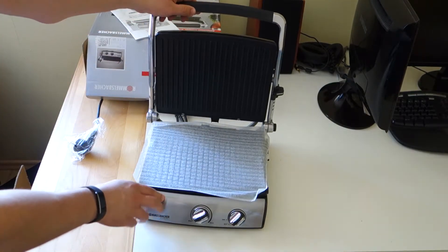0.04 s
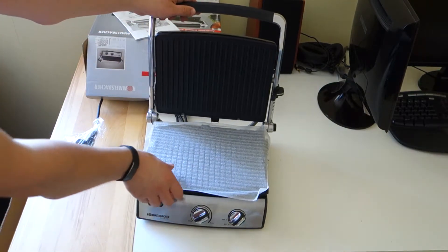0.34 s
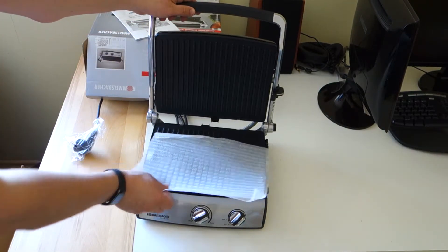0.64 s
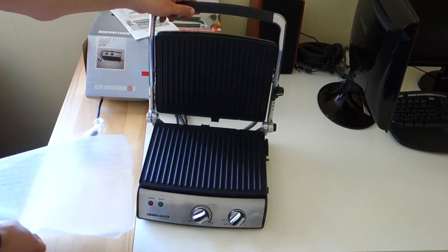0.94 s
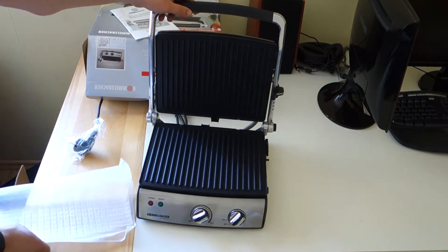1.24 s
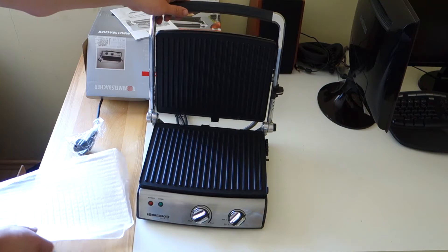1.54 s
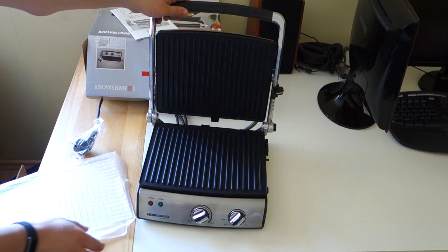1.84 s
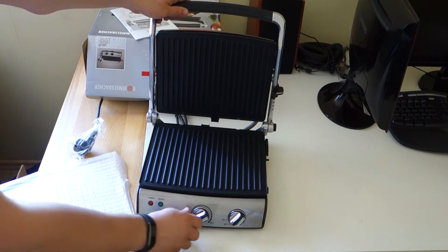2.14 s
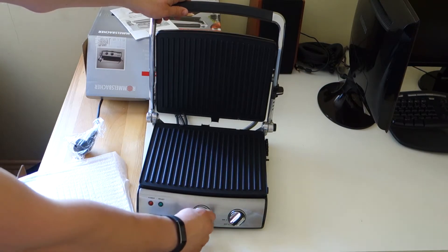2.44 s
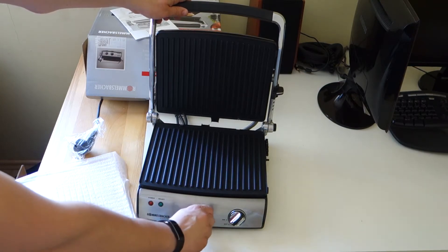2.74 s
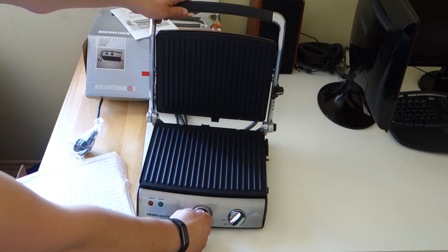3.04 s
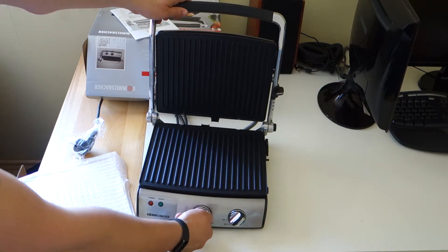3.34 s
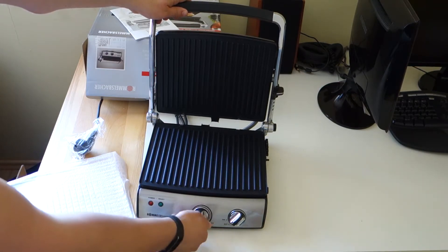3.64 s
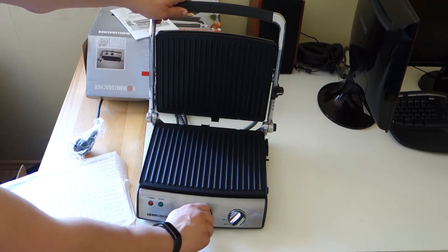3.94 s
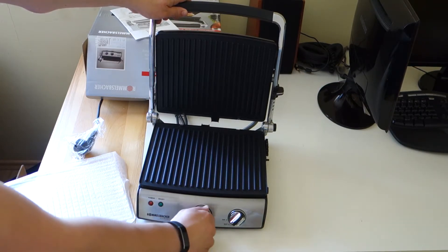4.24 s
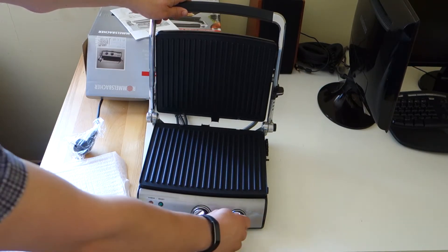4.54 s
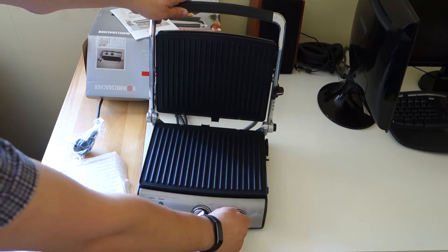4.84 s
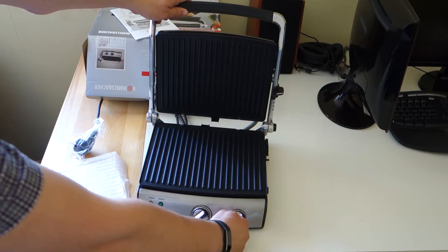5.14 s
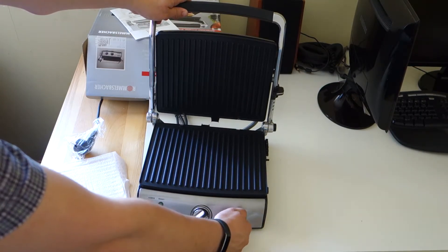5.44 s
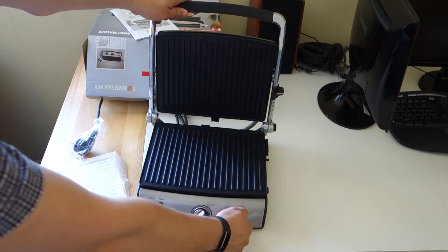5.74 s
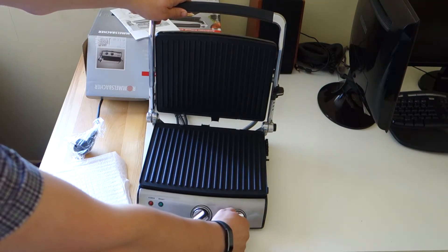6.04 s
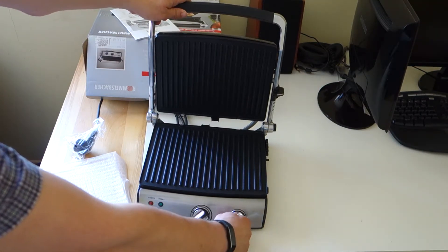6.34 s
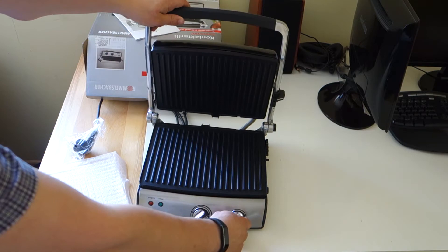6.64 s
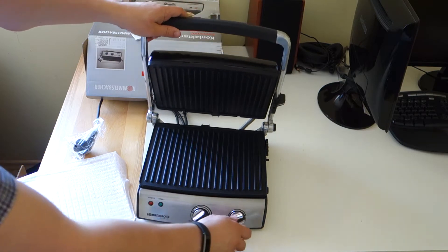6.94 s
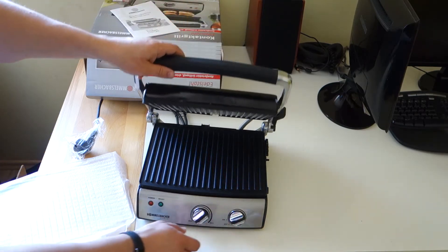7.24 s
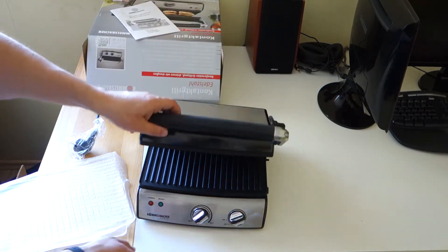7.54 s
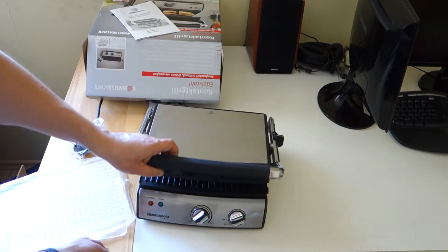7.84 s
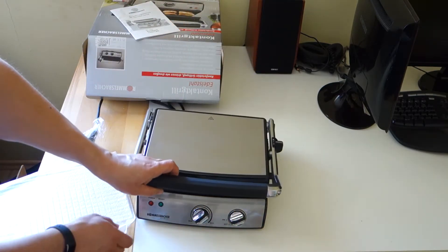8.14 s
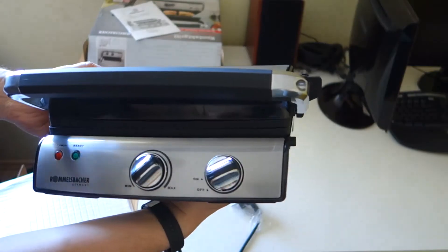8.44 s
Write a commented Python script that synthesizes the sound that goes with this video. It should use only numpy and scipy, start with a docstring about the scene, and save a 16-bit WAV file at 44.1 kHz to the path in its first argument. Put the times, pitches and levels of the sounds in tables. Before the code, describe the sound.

In a bare, slightly ringing room, a nearby stereo microphone picks up fingers rubbing a tabletop grill and a thin sheet crinkling off its plate. A dial clicks and ratchets, then a switch gives two sharp, buzzing snaps, the loudest sounds. Hinges scrape and tick softly before the metal lid lands in a quick cluster of clacks. A fan whines faintly behind it all.

```python
"""A contact grill on a desk in a bare, lively room, heard from a microphone pair 3.1 cm apart.
Fingers rub the housing and a thin packing sheet is pulled off the plate. One knob is clicked and wound
over its ratchet, the other snaps a switch on and off, then the lid scrapes down on its hinges and clacks
shut. Each blow rings the housing and reaches the microphones directly, off the desk and off the walls.
Behind it a fan whines faintly, and a low hum comes and goes."""
import sys
import numpy as np
from scipy import signal
from scipy.fft import rfft, irfft
from scipy.io import wavfile

SR = 44100
rng = np.random.default_rng(int(sys.argv[2]) if len(sys.argv) > 2 else 0)


def wrap_up_sound(samples):
    """Save the sound to the file named by the first command line argument, as 16-bit audio."""
    columns = np.atleast_2d(samples).T
    # keep every value between -1 and 1, then stretch to whole-number steps
    tamed = np.clip(columns, -1, 1)
    steps = np.round(tamed * 32767).astype(np.int16)
    wavfile.write(sys.argv[1], SR, steps)


N = 374409
TIME = np.arange(N) / SR
MIC_GAP_M = .031

# Blows. Each row: start in seconds, relative level in dB, bass in dB, treble in dB.
HAND_BUMPS = [(.11, -57, 12, -5), (.18, -56, 2, -1), (.252, -56.5, -7, 9), (.315, -50, -28, -6),
              (4.135, -45, -7, -3), (7.115, -53, 7, -5)]  # hands on the housing and the desk
SHEET_CRINKLES = [(.53, -45.5, -11, 5), (.742, -43, -1, 2), (.85, -48.5, 7.5, -5)]
LEFT_KNOB_CLICKS = [(2.487, -49, 5, -25), (2.508, -36, -2.5, -11), (2.519, -35.5, -1, -4.5),
                    (2.999, -39.5, -13.5, -20), (4.115, -28.5, -3, 5.5), (4.143, -26.5, -0.5, 4.5),
                    (4.226, -37, 3.5, 1)]
SNAPS = [(5.325, -12, -0.5, 0.5), (5.364, -16.5, 2, -3), (5.922, -11, 3.5, 11), (5.955, -12, -2, 1.5)]  # on, rebound, off, rebound
LID_BLOWS = [(6.395, -47.5, -1, -17), (6.691, -54, 16, 0), (7.08, -52, 11, -25), (7.559, -41, 3.5, 5.5),
             (8.088, -22.5, 0.5, 2.5), (8.116, -21.5, -5, -0.5), (8.152, -20, 0, 2), (8.174, -20.5, 0, -3),
             (8.193, -31, -11, -20)]
ARM_TICKS = [(7.023, -58, -12, 2), (7.178, -53.5, -7, 5), (7.258, -51.5, 0, -3), (7.36, -46.5, -11, 0)]
PLATE_STOPS = [(7.607, -37, -6, -11), (7.734, -44, 4.5, 6.5)]
# The ratchet's teeth. Each row: start in seconds, relative level in dB.
TEETH = [(3.196, -32.5), (3.218, -32), (3.253, -33), (3.279, -33), (3.302, -29), (3.325, -31),
         (3.351, -27.5), (3.378, -25.5), (3.397, -25), (3.416, -29), (3.441, -28.5), (3.472, -28.5),
         (3.497, -27.5), (3.543, -27)]

# Hand strokes. Each row: start in seconds, length in seconds, relative level in dB.
HOUSING_RUBS = [(0, 0.019, -46), (.25, 0.032, -54.5), (.45, .04, -53.5), (.6, 0.026, -51.5),
                (.925, 0.043, -51)]
FINGERTIP_SCRAPES = [(0, 0.065, -59)]
SHEET_TUGS = [(.255, 0.038, -58.5), (.36, 0.059, -58), (.445, 0.067, -60), (.518, .11, -42.5),
              (.68, 0.11, -45.5), (.93, 0.059, -53), (1.61, .06, -58), (1.695, .035, -54.5)]
# Two pushes on the lid. Each row: start in seconds, length in seconds, rubbing in dB, scraping in dB.
LID_PUSHES = [(6.35, 0.37, -52, -69), (6.816, 0.83, -50, -55.5)]

# Broad colour of each source. Each row: frequency in Hz, gain in dB.
AIR_COLOUR = [(15, -55.5), (25, -16), (130, -2.5), (263, -5), (301, -5.5), (344, -7), (560, -13.5),
              (624, -8), (936, -13.5), (1020, -6.5), (1400, -22), (2220, -10.5), (2840, -20.5),
              (12900, -31.5), (16000, -59)]
RUB_COLOUR = [(60, -14), (130, -4.5), (300, -9), (520, -1), (750, -9), (1600, -12), (2400, -13.5),
              (4000, -16), (16000, -40.5)]
SCRAPE_COLOUR = [(500, -40), (1500, 1.5), (2400, -6), (4000, -4.5), (5600, -14), (8000, -7.5), (11000, -29),
                 (16000, -35)]
BUMP_COLOUR = [(25, -5), (60, -19), (130, 0), (240, -10), (400, -10), (1300, -29), (3000, -42),
               (16000, -50)]
SHEET_COLOUR = [(200, -21), (900, -5.5), (2000, -5), (4000, -1), (8000, 5), (11000, 1.5), (16000, -11)]
KNOB_COLOUR = [(30, -34), (75, -19), (115, -3.5), (200, -15), (350, 0.5), (470, -1), (700, 0.5),
               (1200, 0.5), (2300, -2.5), (3300, -7), (5000, -4), (8000, -7.5), (9600, -2.5), (11000, -8),
               (16000, -13)]
RATCHET_COLOUR = [(30, -30.5), (75, -22), (115, -5.5), (160, -16), (220, -11), (350, -6), (500, -4.5),
                  (850, 4), (1400, 4.5), (2400, -2), (4000, -5.5), (6500, -1.5), (9500, -2.5), (13000, -9),
                  (16000, -17)]
ON_COLOUR = [(60, -21), (130, -7), (320, -19.5), (600, -11.5), (1100, 1.5), (1800, 1), (2800, 1),
             (3500, -4.5), (4200, 1), (4800, -3), (5900, 3), (8000, -2.5), (10000, -9.5), (16000, -18.5)]
OFF_COLOUR = [(60, -27), (300, -14), (600, -12.5), (1100, 1.5), (1400, -1.5), (2300, 3), (4400, 7.5),
              (4950, -9), (6000, -4), (8000, -13.5), (9400, -5), (11500, -12), (12700, -11), (16000, -30)]
LID_COLOUR = [(55, -13), (100, -16.5), (180, -7), (290, -12), (450, 3.5), (750, -4.5), (1000, 2),
              (2700, -1), (4000, 0), (5500, -5), (7500, -8.5), (11000, -18), (16000, -34)]
PLATE_COLOUR = [(100, -22), (600, -8), (1000, -3.5), (1600, 1.5), (2100, -4), (3000, -10), (4300, -6),
                (5500, -17), (9000, -27), (16000, -47)]

# Resonances. Each row: frequency in Hz, width in Hz, peak or dip in dB.
FAN_MODES = [(1001.6, 19.3, 11.5), (1480, 400, 4), (2180, 130, 2.5)]
HOUSING_MODES = [(117.8, 8.5, 9.5), (237, 40, 5.5), (310, 73, -10), (361.6, 23, 9.5), (450.4, 60, -3),
                 (510, 52, 8.5), (569.7, 58, 15.5), (614, 73, -12), (851.5, 17, 6.5), (1255, 20, 5.5),
                 (1710, 54, 3), (2390, 700, 4.5)]
HINGE_MODES = [(2850, 150, -7), (3220, 530, -9), (3630, 160, 5.5), (3930, 150, 10.5), (4270, 400, 3),
               (4690, 170, 12.5), (7200, 450, 4), (8400, 400, -2)]
KNOB_SPRING_MODES = [(490, 50, 4), (820, 40, 7), (1210, 36, 3.5), (1357, 19, 6), (1690, 850, -3),
                     (2330, 380, 2.5), (9360, 340, 3), (9700, 160, -5)]  # spring and frame behind the knob
SWITCH_BLADE_MODES = [(1010, 38, 4), (1215, 240, -2), (1766, 170, 7.5), (2000, 40, -0.5), (2650, 35, 4.5),
                      (2860, 86, 3.5), (5860, 220, 5), (6460, 60, -3), (7300, 200, -5.5)]  # blade and case
LID_COVER_MODES = [(292, 50, 19), (668, 28, 11), (867, 7.5, 4.5), (1280, 40, -2.5), (1604, 14, 7.5),
                   (2760, 19, 10.5), (3100, 20, 6), (7660, 21, -8)]  # the lid's plate and cover

# The room's decay. Each row: frequency in Hz, time to fall 60 dB in seconds.
ROOM_DECAY = [(100, 0.664), (450, 0.45), (1000, 0.65), (2000, 0.7), (4000, 0.63), (6000, 0.59),
              (9000, 0.42), (15000, 0.24)]


def undb(db):
    """Decibels to gain."""
    return 10 ** (np.asarray(db) / 20)


def unit(x):
    """Scale to rms 1."""
    return x / np.sqrt(np.mean(x ** 2))


def bins(size):
    """Frequencies of a spectrum of `size` samples."""
    return np.maximum(np.fft.rfftfreq(size, 1 / SR), 1)


def walk(rate):
    """A random drift with a spread near 1 and `rate` turns a second."""
    knots = rng.standard_normal(int(rate * N / SR) + 2)
    return np.interp(TIME * rate, np.arange(len(knots)), knots)


def fade(power, seconds):
    """Let stored energy leak away with the given time constant."""
    keep = np.exp(-1 / (seconds * SR))
    return signal.lfilter([1 - keep], [1, -keep], power)


def swell(start, length):
    """A half-sine arch from rest to 1 and back to rest."""
    share = (TIME - start) / length
    return np.where((share > 0) & (share < 1), np.abs(np.sin(np.pi * share)), 0)


def colour(hz, points, resonances=()):
    """Gain in dB: a broad outline with resonant peaks and dips on it."""
    at, db = np.transpose(points)
    outline = np.interp(np.log(hz), np.log(at), db)
    return outline + sum(peak / (1 + (2 * (hz - f) / width) ** 2) for f, width, peak in resonances)


def ring(db):
    """Causal response of unit energy with the given gain curve."""
    cepstrum = irfft(np.log(undb(db)))
    half = len(cepstrum) // 2
    cepstrum[1:half] *= 2
    cepstrum[half + 1:] = 0
    response = irfft(np.exp(rfft(cepstrum)))
    return response / np.linalg.norm(response)


def through(x, points, resonances=(), size=8192):
    """Play a drive signal through a resonant body."""
    return signal.fftconvolve(x, ring(colour(bins(size), points, resonances)))[:len(x)]


def diffuse(size):
    """Spectra of noise from all sides at the two microphones: alike in the bass, unrelated higher up."""
    likeness = .99 * np.sinc(2 * bins(size) * MIC_GAP_M / 343)
    mid, side = rfft(rng.standard_normal((2, size)))
    return mid * np.sqrt(1 + likeness) + np.array([[1], [-1]]) * side * np.sqrt(1 - likeness)


def room(power, direct_db, desk_db, desk_s=0.0084, build_s=0.0026):
    """A burst of power reaches the microphones as noise: straight, off the desk, then off the walls."""
    size = len(power)
    field = diffuse(size)
    direct = rng.standard_normal(size) * np.sqrt(2 * power)
    desk = irfft(diffuse(size)) * np.sqrt(fade(power, desk_s))
    band_hz, t60s = np.transpose(ROOM_DECAY)
    walls, arriving = 0, fade(power, build_s)
    for band, t60 in zip(np.eye(len(band_hz)), t60s):
        weight = np.interp(np.log(bins(size)), np.log(band_hz), band)
        tail = np.sqrt(fade(arriving, t60 / np.log(10 ** 6)))
        walls = walls + irfft(field * weight) * tail
    return undb(direct_db) * direct + undb(desk_db) * desk + walls


def in_room(sound):
    """Carry a mono sound from the desk through the room to both microphones."""
    response = room(signal.unit_impulse(2 ** 15), direct_db=-2, desk_db=-1.5)
    response /= np.linalg.norm(response[0])
    return signal.fftconvolve(sound[None], response, axes=1)[:, :N]


def strokes(events, attack_s=0.0029, release_s=0.018):
    """Force of short hand strokes: each takes hold, stays for its length and lets go."""
    force = 0
    for start, length, db in events:
        hold = np.clip((TIME - start) / attack_s, 0, 1)
        release = np.exp(-np.maximum(TIME - start - length, 0) / release_s)
        force = force + undb(db) * hold * release
    return force


def friction(force, slips_per_s, scatter_db, uneven_db):
    """Tiny slips of unequal size; they follow the force in fits and starts."""
    slips = (rng.random(N) < slips_per_s / SR) * rng.standard_normal(N)
    sizes = undb(scatter_db * np.minimum(rng.exponential(size=N), 3))
    return unit(slips * sizes) * force * undb(uneven_db * walk(45))


def small_modes(hz):
    """The crowded high modes of a metal part: irregular peaks and dips in dB."""
    at = np.arange(0, SR / 2, 70)
    ripple_db = np.interp(hz, at, 2.6 * rng.standard_normal(len(at)))
    return ripple_db * hz / (hz + 2500)


def chatter(t, contact_s, uneven_db=-1.5, impact_s=0.00059):
    """Power of a chattering contact: a quick run of unequal tiny impacts that dies out."""
    impacts = rng.standard_normal(128)
    impact_db = uneven_db * np.interp(t / impact_s, np.arange(len(impacts)), impacts)
    power = undb(impact_db) ** 2 * np.exp(-(t / contact_s) ** 2)
    return power / power.sum()


def blows(events, part, modes, gain_db, close_db, contact_s, buzz_db=-22, buzz_s=0.013, size=32768):
    """Contact chatter and a buzz of loose metal ring part and housing; more close_db sounds nearer."""
    out = np.zeros((2, N + size))
    hz, t = bins(size // 2), np.arange(size) / SR
    bass_shelf = 1 / (1 + (hz / 1000) ** 4)
    treble_shelf = 1 / (1 + (5000 / hz) ** 4)
    buzz = undb(buzz_db) ** 2 * np.exp(-t / buzz_s) / (buzz_s * SR)
    body_db = colour(hz, part, list(HOUSING_MODES) + list(modes)) + small_modes(hz)
    for start_s, db, bass_db, treble_db in events:
        body = ring(body_db + bass_db * bass_shelf + treble_db * treble_shelf)
        scattered = room(chatter(t, contact_s) + buzz, direct_db=close_db - 5, desk_db=close_db)
        blow = signal.fftconvolve(scattered, body[None], axes=1)[:, :size]
        start = int(start_s * SR)
        out[:, start:start + size] += undb(db + gain_db) * blow
    return out[:, :N]


def air_and_fan(level_db=-59):
    """Room tone from all sides, with the narrow, wavering whine of a fan."""
    spectrum = diffuse(2 * N) * undb(colour(bins(2 * N), AIR_COLOUR, FAN_MODES))
    air = irfft(spectrum)[:, :N]
    return unit(air) * undb(level_db + .5 * walk(0.94))


def rubbing():
    """Fingers, and later the moving lid, rub and boom in the housing; a faster lid rubs louder."""
    force = strokes(HOUSING_RUBS)
    for start, length, rub_db, _ in LID_PUSHES:
        speed = swell(start, length)
        force += undb(rub_db) * speed ** 0.93
    slips = friction(force, slips_per_s=1200, scatter_db=-2, uneven_db=2)
    return through(slips, RUB_COLOUR, HOUSING_MODES)


def scraping():
    """A fingertip scrapes off the front panel; later the hinge scrapes with the lid's speed squared."""
    force = strokes(FINGERTIP_SCRAPES)
    for start, length, _, scrape_db in LID_PUSHES:
        speed = swell(start, length)
        force += undb(scrape_db) * speed ** 2
    slips = friction(force, slips_per_s=1100, scatter_db=0, uneven_db=2.5)
    return undb(0.5) * through(slips, SCRAPE_COLOUR, HINGE_MODES)


def bumps():
    """Hands thud against the housing and the desk."""
    return blows(HAND_BUMPS, BUMP_COLOUR, [], gain_db=25.5, close_db=-4.5, contact_s=0.0067)


def sheet_hiss():
    """The thin packing sheet hisses over the plate's ribs with each tug."""
    force = strokes(SHEET_TUGS, attack_s=0.016, release_s=0.017)
    slips = friction(force, slips_per_s=4000, scatter_db=2, uneven_db=1.5)
    return undb(0.5) * through(slips, SHEET_COLOUR)


def crinkles():
    """The sheet buckles in brief, crisp snaps."""
    return blows(SHEET_CRINKLES, SHEET_COLOUR, [], gain_db=27, close_db=-4, contact_s=.008)


def knob():
    """The left knob clicks in and out of its rest, ringing its spring and frame."""
    return blows(LEFT_KNOB_CLICKS, KNOB_COLOUR, KNOB_SPRING_MODES,
                 gain_db=26, close_db=-2.5, contact_s=0.0061)


def ratchet(bass_db_per_s=-18, treble_db_per_s=32.5):
    """The knob winds over its teeth: the tighter the spring, the less bass and the more treble."""
    start_s, db = np.transpose(TEETH)
    wound_s = start_s - start_s[0]
    dulling_db = 0.93 * (db - db.mean())  # a harder tooth gains more body than edge
    bass_db = 5 + bass_db_per_s * wound_s
    treble_db = -3 + treble_db_per_s * wound_s - dulling_db
    teeth = np.column_stack([start_s, db, bass_db, treble_db])
    return blows(teeth, RATCHET_COLOUR, KNOB_SPRING_MODES, gain_db=24, close_db=4.5, contact_s=0.0061)


def switch():
    """The sprung switch behind the right knob snaps on, then off; each time it rebounds and buzzes."""
    on = blows(SNAPS[:2], ON_COLOUR, SWITCH_BLADE_MODES,
               gain_db=16, close_db=-5, contact_s=0.0068, buzz_db=-3.5, buzz_s=0.03)
    off = blows(SNAPS[2:], OFF_COLOUR, SWITCH_BLADE_MODES,
                gain_db=14.5, close_db=-5, contact_s=0.0024, buzz_db=3, buzz_s=0.027)
    return on + off


def hum(start_s=5.62, length_s=0.7, level_db=-61, start_hz=248, rise_hz_per_s=8.7):
    """A faint, wavering tone in the centre swells for a moment and rises a little."""
    hz = start_hz + rise_hz_per_s * (TIME - start_s)
    tone = np.sqrt(2) * np.sin(2 * np.pi * np.cumsum(hz) / SR)
    return tone * swell(start_s, length_s) * undb(level_db + 2.3 * walk(26))


def lid():
    """The lid knocks on its way down, then lands and rocks; its plate and cover ring on."""
    return blows(LID_BLOWS, LID_COLOUR, LID_COVER_MODES, gain_db=26.5, close_db=-2, contact_s=0.012)


def hinge_ticks():
    """The hinge arms tick as they slip."""
    return blows(ARM_TICKS, SCRAPE_COLOUR, HINGE_MODES, gain_db=21.5, close_db=5, contact_s=0.0047)


def plate_clinks():
    """The floating plate swings against its stops in the arms."""
    return blows(PLATE_STOPS, PLATE_COLOUR, [], gain_db=26.5, close_db=-0.5, contact_s=0.0096)


def scene(stop_s=8.427):
    """The grill rings in the room; the last tail stops abruptly and leaves the air and the fan."""
    knocks = knob() + ratchet() + switch() + hinge_ticks() + plate_clinks() + bumps() + lid()
    handling = in_room(rubbing() + scraping() + sheet_hiss()) + crinkles()
    gate = np.clip((stop_s - TIME) / .003, 0, 1)
    return (knocks + handling) * gate + hum() + air_and_fan()


def record(dry, top_hz=16000):
    """The recorder rounds the highest peaks and cuts the top."""
    ceiling = undb(0.5)
    rounded = ceiling * np.tanh(dry / ceiling)
    lowpass = signal.ellip(10, .2, 70, top_hz, fs=SR, output="sos")
    return signal.sosfilt(lowpass, rounded)


dry = scene()
out = record(dry)
wrap_up_sound(out)
```